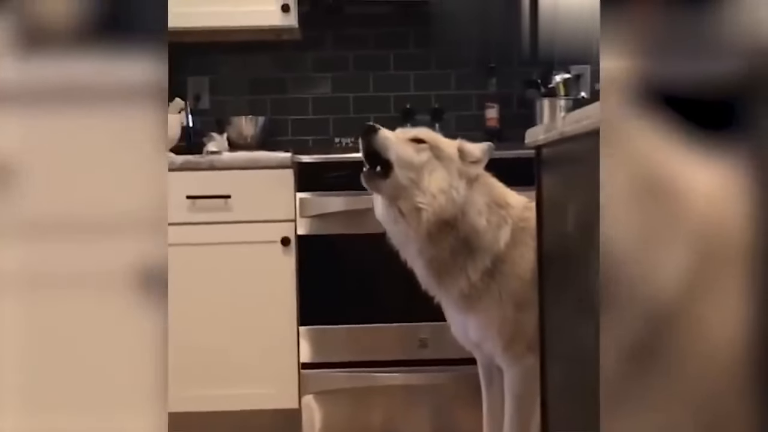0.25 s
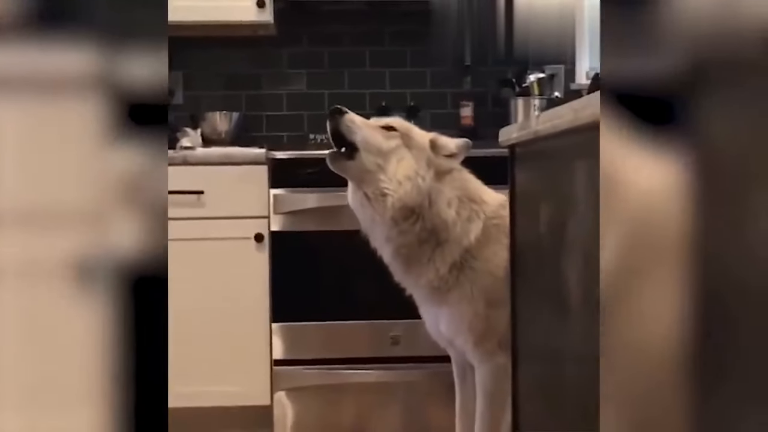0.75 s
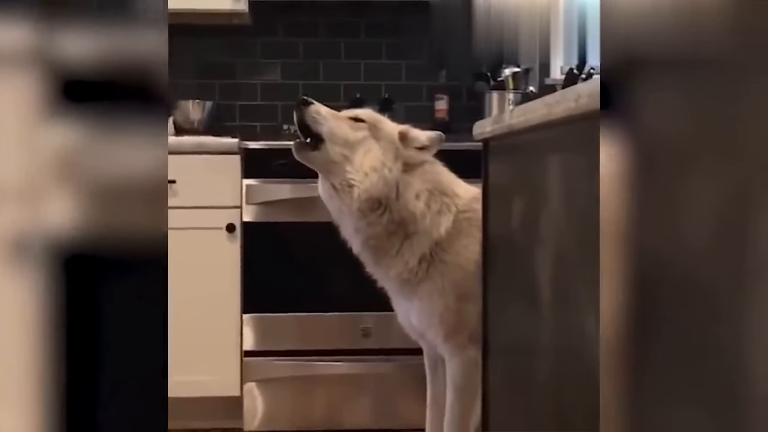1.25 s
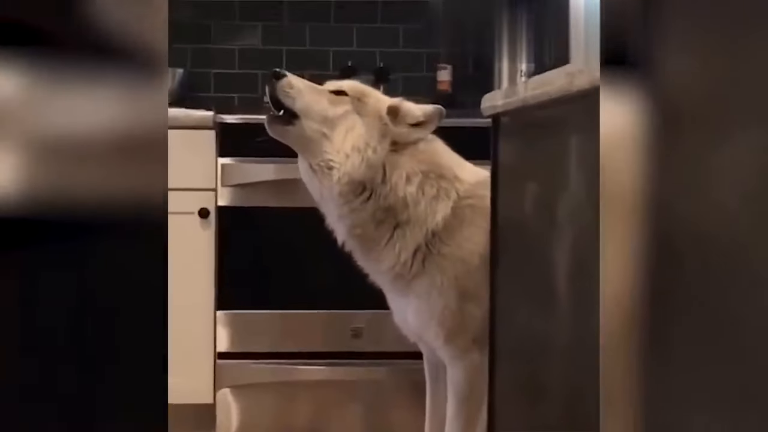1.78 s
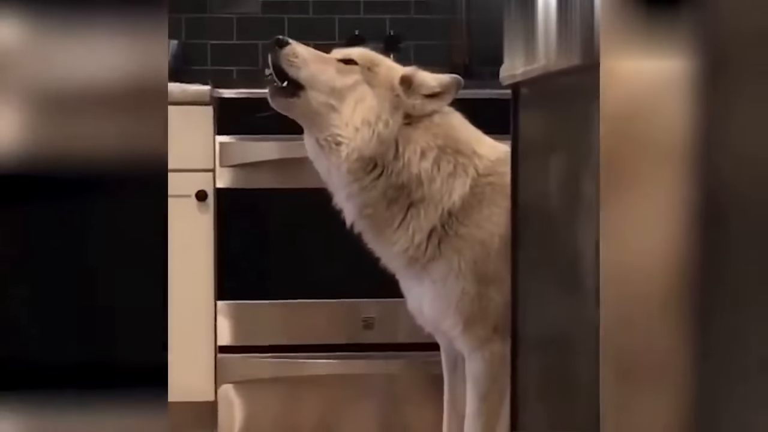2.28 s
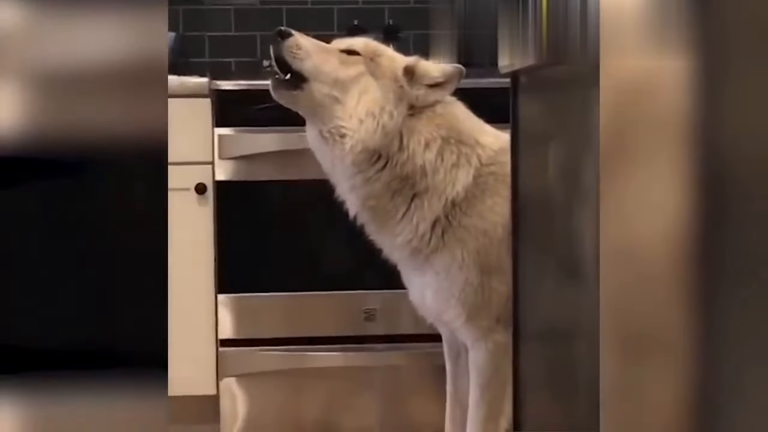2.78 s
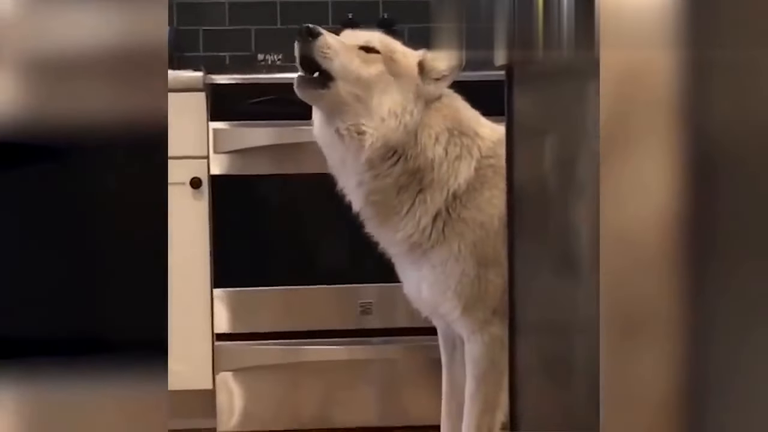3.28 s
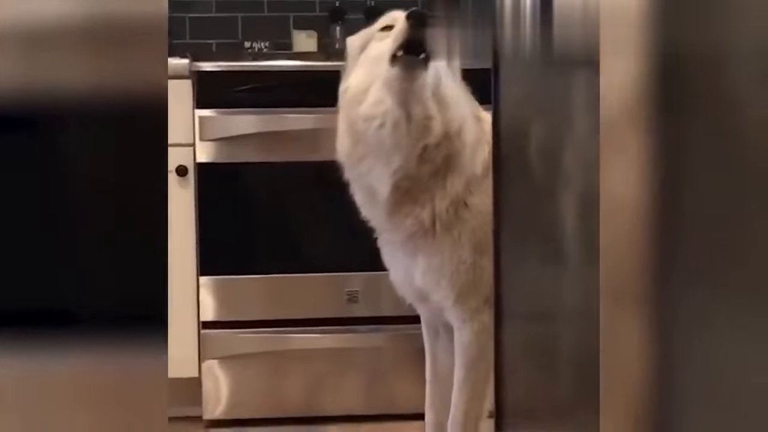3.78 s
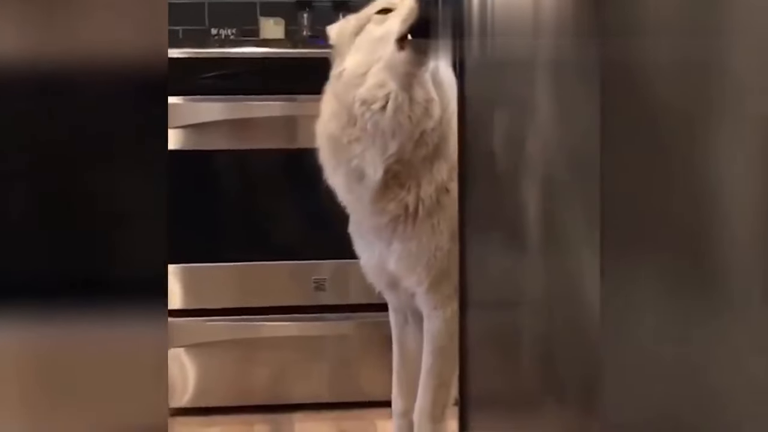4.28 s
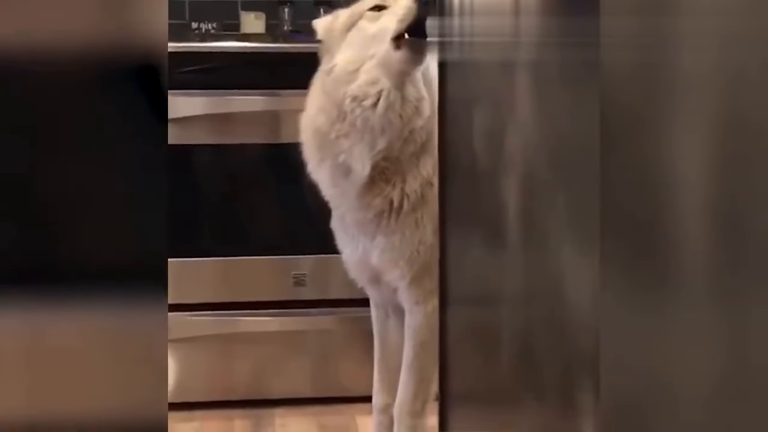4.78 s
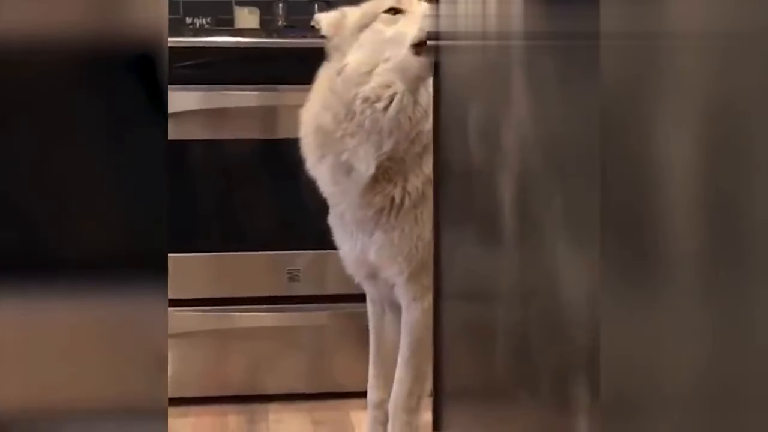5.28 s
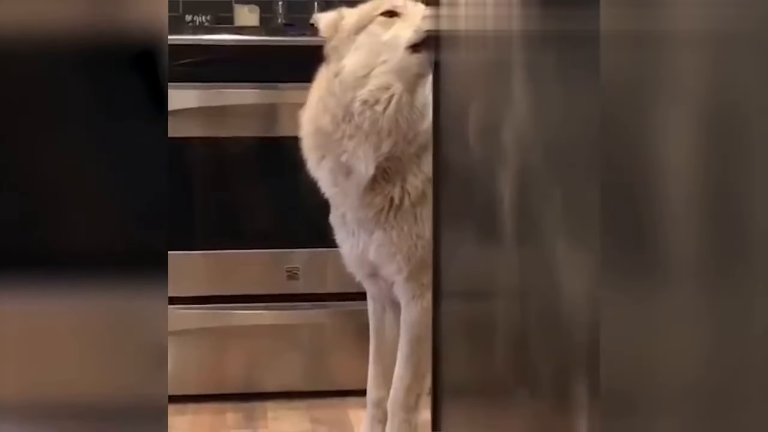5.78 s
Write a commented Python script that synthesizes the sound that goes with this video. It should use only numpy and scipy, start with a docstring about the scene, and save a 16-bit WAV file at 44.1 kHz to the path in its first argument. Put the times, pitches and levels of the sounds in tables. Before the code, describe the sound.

A large dog gives one unbroken howl of about six seconds in a kitchen. From the very start it holds a thin, airy high note that slowly sags, wavering in loudness, with a soft hiss of air and a slight rasp at about 1.3 seconds. Near 1.9 seconds the voice cracks and drops suddenly into a fuller, lower note. This holds fairly steady, droops a little around 3.8 seconds, then recovers and is at its strongest and brightest from about 4.1 to 4.5 seconds. After 5.4 seconds the pitch sinks, the voice roughens slightly, and it fades away by about 6 seconds. The dog is in the same room as the microphone, its muzzle pointing up and away. Cupboards and tiles add a short ring, and an appliance hums very faintly underneath throughout.

```python
"""A large dog howls once in a kitchen, its muzzle pointed up and away from a mono microphone.
Its vocal folds hold a thin, airy high note that sags, breaks suddenly into a fuller low register,
droops as the head turns, recovers and sinks away. Air rushes through the glottis and hisses in
the open mouth. Nearby cupboards and hard tiles answer briefly, and the partials dip in the
room's standing waves. An appliance hums faintly underneath."""
import sys
import numpy as np
from scipy import signal
from scipy.fft import rfft, irfft, next_fast_len
from scipy.io import wavfile
from scipy.ndimage import uniform_filter1d, map_coordinates

SR = 44100
rng = np.random.default_rng(int(sys.argv[2]) if len(sys.argv) > 2 else 0)


def wrap_up_sound(samples):
    """Save the sound to the file named by the first command line argument, as 16-bit audio."""
    columns = np.atleast_2d(samples).T
    # keep every value between -1 and 1, then stretch to whole-number steps
    tamed = np.clip(columns, -1, 1)
    steps = np.round(tamed * 32767).astype(np.int16)
    wavfile.write(sys.argv[1], SR, steps)


N = 266667
TIME_S = np.arange(N) / SR
STEP = 32  # samples per value of a slow control
BREAK_S = 1.855  # the voice drops from the high register to the low


def amp(db):
    """Decibels to gain."""
    return np.exp(np.asarray(db) * np.log(10) / 20)


def unit(x):
    """x at rms 1."""
    return x / np.sqrt(np.mean(x ** 2) + 1e-20)


def along(points, hz):
    """(freq_hz, value) points read on a log axis."""
    freqs, values = np.transpose(points)
    return np.interp(np.log(hz + 1), np.log(freqs + 1), values)


def curves(rows):
    """One value per sample for each column after the time."""
    times, *columns = np.transpose(rows)
    return [np.interp(TIME_S, times, column) for column in columns]


def held(slow):
    """A slow control as one value per sample."""
    return uniform_filter1d(np.repeat(slow, STEP), size=STEP)[:N]


def wobble(rate):
    """A smooth random curve, rate knots a second."""
    knots = rng.standard_normal(int(N * rate / SR) + 4)
    return held(map_coordinates(knots, [np.arange(0, N, STEP) * rate / SR]))


def swell(centre_s, half_s):
    """A bell-shaped bump in time, 1 at its centre."""
    return np.exp(-((TIME_S - centre_s) / half_s) ** 2)


def filtered(x, response):
    """x times a response of frequency."""
    size = next_fast_len(N + SR // 2)
    return irfft(rfft(x, size) * response(np.fft.rfftfreq(size, 1 / SR)), size)[:N]


def noise(spectrum):
    """Noise of rms 1, coloured by (freq_hz, density_db) points."""
    return unit(filtered(rng.standard_normal(N), lambda hz: amp(along(spectrum, hz))))


def resonances(modes, hz):
    """Gain of a set of steep-sided resonances."""
    return sum(amp(db) / (1 + (2 * (hz - centre) / width) ** 2) for centre, width, db in modes)


# The high note sags until it breaks: time_s, pitch_hz
HIGH_PITCH = [(0, 524), (.1, 518.5), (.6, 505), (.82, 489), (1.33, 462.5), (1.5, 462), (1.72, 432),
              (1.79, 424), (1.85, 395)]
# The low note holds, droops as the head turns, recovers and falls: time_s, pitch_hz
LOW_PITCH = [(1.86, 356), (1.89, 349.7), (2.05, 333), (2.3, 333.3), (2.7, 338.8), (3.1, 342.2), (3.45, 337),
             (3.77, 318), (3.88, 321.3), (4.03, 322), (4.17, 334.4), (4.32, 338.4), (4.6, 340.8),
             (4.9, 340.9), (5.37, 334.3), (5.72, 310.7), (5.84, 299.7)]
# Rasps in the voice: centre_s, half_length_s, added_roughness, added_rush_db
VOICE_RASPS = [(1.323, .05, .7, 2), (1.861, .04, .7, 2.5), (1.962, 0.067, .15, 6.5)]


def vocal_folds(switch_s=.012, sink_hz_per_s=70, slack_hz=328.6):
    """The folds change register (low goes from 0 to 1), and slacken and roughen below slack_hz."""
    low = np.clip(.5 + (TIME_S - BREAK_S) / switch_s, 0, 1)
    (high_hz,), (low_hz,) = curves(HIGH_PITCH), curves(LOW_PITCH)
    final_sink_hz = sink_hz_per_s * np.maximum(TIME_S - LOW_PITCH[-1][0], 0)
    pitch = (1 - low) * high_hz + low * low_hz - final_sink_hz
    slack = np.exp(-np.maximum(pitch - slack_hz, 0) / 6)
    rough = (1 - low) * .2 + low * .11 + .26 * np.clip((slack_hz - pitch) / 40, 0, 1)
    # rushing air grows as the high note is strained and weakens when the folds slacken
    rush_db = (1 - low) * (-33 + 3.5 * TIME_S) + low * (-35 - 5 * slack)
    for centre_s, half_s, added_roughness, added_rush_db in VOICE_RASPS:
        rasp = swell(centre_s, half_s)
        rough += added_roughness * rasp
        rush_db += added_rush_db * rasp
    return pitch, low, slack, rough, rush_db


def fold_phase(pitch, rough, jitter=.008, waver=.009):
    """Phase of the folds: a slow waver and a quick jitter, both growing with roughness."""
    drift = rough * (waver * wobble(50) + jitter * wobble(160))
    return 2 * np.pi * np.cumsum(pitch * (1 + drift)) / SR


# Partials passing through the room's nulls: centre_s, partial_number, half_length_s, depth_db
ROOM_NULLS = [(0.277, 1, 0.059, -19.5), (0.418, 2, 0.073, -17.5), (0.561, 1, 0.11, -22.5),
              (0.857, 2, 0.019, -17), (1.072, 1, 0.02, -4), (1.106, 2, 0.047, -12.5), (1.27, 2, 0.049, -24),
              (1.327, 1, 0.085, -10), (1.54, 2, 0.03, -14.5), (1.567, 1, 0.076, -18), (1.654, 1, 0.042, -7),
              (2.056, 2, 0.022, -11), (2.474, 2, 0.163, -20), (2.712, 3, 0.18, -8), (3.0, 3, 0.087, -10.5),
              (3.209, 3, 0.031, -18), (3.517, 2, 0.027, -17), (3.554, 1, 0.117, -4),
              (3.737, 3, 0.023, -14.5), (4.032, 2, 0.23, -20.5), (4.069, 3, 0.041, -22),
              (4.17, 1, 0.121, -19.5), (4.393, 3, 0.101, -21.5), (4.538, 4, 0.22, -15.5),
              (4.982, 4, 0.22, -14), (5.421, 4, 0.25, -16), (5.429, 1, 0.078, -29),
              (5.596, 1, 0.025, -14.5), (5.828, 1, 0.061, -18.5)]


def standing_waves(k, pitch, ripple_db=5, half_ripple_hz_per_s=320):
    """Gain of partial k at the microphone: sharp nulls, and a ripple that deepens with faster glides."""
    dips = np.ones_like(TIME_S[::STEP])
    for centre_s, partial, half_s, depth_db in ROOM_NULLS:
        if round(partial) == k:
            away = ((TIME_S[::STEP] - centre_s) / half_s) ** 2
            dips *= np.sqrt((away + amp(depth_db) ** 2) / (away + 1))
    glide = k * uniform_filter1d(np.abs(np.gradient(pitch)) * SR, size=SR // 5)
    return held(dips) * amp(ripple_db * glide / (glide + half_ripple_hz_per_s) * wobble(22))


# Each note before the room's nulls: time_s, fundamental_db, octave_db, third_and_fourth_db
HIGH_LEVELS = [(0.0, -20, -34, -64.5), (0.05, -20, -21.5, -58), (0.34, -31.0, -24.5, -50),
               (0.6, -27.0, -23, -57), (0.76, -25, -28, -59.0), (1.05, -24, -33.5, -57.5),
               (1.2, -20.0, -27, -49.5), (1.54, -18.5, -28, -58.5), (1.66, -19.5, -39.5, -44),
               (1.82, -21, -34, -43)]
LOW_LEVELS = [(1.861, -17.5, -26.5, -37.0), (1.95, -17.5, -28.5, -36), (2.06, -22.0, -31.5, -31.5),
              (2.74, -18.5, -26.5, -28.5), (3.08, -17.5, -34.5, -38.5), (3.46, -16.5, -30.5, -27.5),
              (3.7, -18.0, -28, -35.5), (3.85, -21.0, -34.5, -38), (4.109, -11.0, -25.5, -21),
              (4.38, -14.5, -22.0, -26), (4.59, -17.5, -24, -32.5), (5.29, -18.5, -21.5, -27.0),
              (5.56, -20.0, -45.0, -34.5), (5.69, -17.0, -43.5, -31), (5.84, -19.5, -32.5, -47),
              (6.05, -35.5, -60, -71)]
# Mouth resonance that the high note's fourth partial slides off: centre_hz, width_hz, gain_db
FOURTH_RESONANCE = [(2115, 260, 0.5)]


def partial_strengths(pitch, low):
    """The four lowest partials: at the break the first chokes; the third cracks as the folds catch."""
    first_db, second_db, third_db = (1 - low) * curves(HIGH_LEVELS) + low * curves(LOW_LEVELS)
    choke_db = -21 * swell(BREAK_S - .012, half_s=.015)
    crack_db = 15.5 * swell(BREAK_S + .0075, half_s=.009)
    fourth_gain = (1 - low) * resonances(FOURTH_RESONANCE, 4 * pitch) + low * amp(-4)
    levels = [amp(first_db + choke_db), amp(second_db),
              amp(third_db + crack_db), amp(third_db) * fourth_gain]
    return [level * standing_waves(k, pitch) for k, level in enumerate(levels, 1)]


def howl_tone(phase, strengths, rough, shimmer=.2, tremor=.32):
    """The folds sound the low partials, each trembling more as the voice roughens."""
    tone = np.zeros(N)
    for k, strength in enumerate(strengths, 1):
        unsteady = 1 + rough * (tremor * wobble(35) + shimmer * wobble(110))
        tone += np.sqrt(2) * strength * unsteady * np.sin(k * phase + rng.uniform(0, 2 * np.pi))
    return tone


# Colour of the air in the glottis: freq_hz, density_db
RUSH_SPECTRUM = [(150, -37), (280, -17), (400, 1), (560, -5), (690, 4.5), (850, -11), (1100, -1.5),
                 (1250, -10), (1400, -7.5), (1650, -29.5), (2500, -38), (4000, -79)]


def rushing_air(effort, rush_db):
    """Air rushes through the glottis, following the strength of the voice."""
    return effort * amp(rush_db) * cupboards(noise(RUSH_SPECTRUM))


# Antiresonances of the airway: centre_hz, width_hz, depth_db
CAVITY_NOTCHES = [(1840, 74, -6), (2980, 130, -11), (4120, 99, -24), (5250, 140, -21.5), (7040, 51, -11.5)]


def side_cavities(hz):
    """Gain left after the side cavities swallow their narrow bands."""
    return amp(sum(db * np.exp(-((hz - centre) / width) ** 2) for centre, width, db in CAVITY_NOTCHES))


def overtones(pitch, phase, modes, highest, flicker=.14):
    """Partials above the fourth, rms near 1, each flickering and swelling as it crosses resonances."""
    grid_hz = np.arange(SR // 2)
    shape = resonances(modes, grid_hz) * side_cavities(grid_hz)
    t, knots_s = TIME_S[::STEP], np.arange(0, N / SR, .03)
    wave, power = np.zeros(N), np.zeros(len(t))
    for k in range(5, highest + 1):
        gain = np.interp(k * pitch[::STEP], grid_hz, shape)
        unsteady = 1 + flicker * np.interp(t, knots_s, rng.standard_normal(len(knots_s)))
        wave += held(gain * unsteady) * np.sin(k * phase + rng.uniform(0, 2 * np.pi))
        power += gain ** 2 / 2
    return wave / held(np.sqrt(power))


# Resonances of the throat and, above them, the muzzle: centre_hz, width_hz, gain_db
THROAT_MODES = [(1569, 110, 3.5), (1990, 150, -1), (2436, 140, -8), (2650, 150, -12.5), (3060, 76, -21)]
MUZZLE_MODES = [(3724, 150, 2), (3890, 63, -11), (4516, 120, -8), (4755, 360, -6.5), (5665, 190, -11.5),
                (5760, 130, -22), (6670, 49, -15), (6930, 95, -21), (7840, 270, -34), (9000, 200, -21),
                (10800, 450, -34)]
# Their overtones through the high note and the low note: time_s, level_db
THROAT_HIGH = [(0.02, -56), (0.2, -67), (0.4, -60), (0.66, -60), (0.9, -71), (1.35, -67.0), (1.68, -67),
               (1.77, -48), (1.84, -53)]
THROAT_LOW = [(1.879, -55), (2, -65.5), (2.15, -54.5), (2.75, -69.5), (3.05, -63.5), (3.48, -65),
              (3.65, -62), (3.8, -57.5), (4.12, -50.5), (4.801, -53.5), (5.3, -59), (5.55, -61.5),
              (5.8, -65.5), (6.031, -81)]
MUZZLE_HIGH = [(0.02, -52), (0.25, -64), (0.7, -63.5), (1.15, -64.5), (1.32, -53.5), (1.55, -65),
               (1.84, -65.5)]
MUZZLE_LOW = [(1.88, -60.5), (2.1, -66), (2.45, -62.5), (2.949, -54.5), (3.15, -62), (3.38, -54.5),
              (3.6, -72.5), (4, -66.0), (4.25, -46.5), (4.5, -52), (4.95, -56), (5.4, -68), (5.65, -71.5),
              (6.03, -92.0)]


def throat_and_muzzle(pitch, phase):
    """Overtones ringing in throat and muzzle, and the average of their two level curves."""
    throat_db, = curves(np.vstack([THROAT_HIGH, THROAT_LOW]))
    muzzle_db, = curves(np.vstack([MUZZLE_HIGH, MUZZLE_LOW]))
    throat = amp(throat_db + .1) * overtones(pitch, phase, THROAT_MODES, highest=10)
    muzzle = amp(muzzle_db + .4) * overtones(pitch, phase, MUZZLE_MODES, highest=33)
    return throat + muzzle, (throat_db + muzzle_db) / 2


# Resonances of the open mouth: centre_hz, width_hz, gain_db
MOUTH_MODES = [(2080, 100, 3), (2560, 230, 5.5), (3880, 410, 0), (4690, 210, 5), (5870, 230, -1),
               (6430, 860, 0), (8740, 770, -10.5), (9660, 500, -6), (10770, 600, -10.5),
               (12000, 600, -20.5)]


def mouth_hiss(phase, low, treble_db, flutter=.3, edge_hz=7500, waver_db=.93):
    """Air escapes in a puff each time the folds open; in the high register they never quite close."""
    puffs = (1 + flutter * np.sin(phase)) * rng.standard_normal(N)
    air = unit(filtered(puffs, lambda hz: resonances(MOUTH_MODES, hz) * side_cavities(hz)))
    top = filtered(air, lambda hz: hz > edge_hz)
    air = air - top + top * amp(2.5 - 2 * np.minimum(TIME_S, BREAK_S))  # dulls up to the break
    high_db = -56.5 - 2.1 * TIME_S  # fades as the air runs out
    low_db = -73.5 + .6 * (treble_db - treble_db.mean())
    level_db = uniform_filter1d((1 - low) * high_db + low * low_db, size=SR // 10)
    return amp(level_db + waver_db * wobble(8)) * air


# Room tone at the microphone: freq_hz, density_db
ROOM_TONE = [(20, -20), (45, -12), (72, -0.5), (100, -10), (130, -8.5), (180, -10), (300, -6.5),
             (700, -16.5), (1500, -27), (4000, -33.5), (12000, -44.5)]


def appliance_and_room_tone(hum_hz=74.6):
    """An appliance hums, wavering slightly, in the quiet air of the kitchen."""
    hum = amp(-65.5 + 2 * wobble(5)) * np.sin(2 * np.pi * np.cumsum(hum_hz + wobble(4.6)) / SR)
    return hum + amp(-61) * noise(ROOM_TONE)


# Cupboard doors, worktop and oven front, within a few metres: delay_s, level_db
EARLY_ECHOES = [(.0023, -17.5), (.0047, -16.5), (.0083, -17), (0.013, -17.5), (0.0193, -7)]


def cupboards(x):
    """Early echoes comb the sound, so gliding partials swell and fade in turn."""
    def comb(hz):
        return 1 + sum(amp(db) * np.exp(-2j * np.pi * hz * delay_s) for delay_s, db in EARLY_ECHOES)
    return filtered(x, comb) / np.sqrt(1 + sum(amp(db) ** 2 for _, db in EARLY_ECHOES))


# Decay of the tiled kitchen: freq_hz, t60_s
KITCHEN_DECAY = [(200, 0.18), (1000, 1), (4000, 0.14), (10000, 0.077)]


def kitchen_reverb(x):
    """The diffuse answer of the room, ringing longest in the midrange."""
    hz, t, spectrum = signal.stft(rng.standard_normal(SR // 2), SR, nperseg=256)
    decay = amp(-60 * t / along(KITCHEN_DECAY, hz)[:, None])
    _, tail = signal.istft(spectrum * decay, SR, nperseg=256)
    return signal.fftconvolve(x, tail / np.linalg.norm(tail))[:N]


def growl(phase, effort, slack):
    """In the low note, slack folds alternate strong and weak cycles, adding a tone an octave down."""
    return effort * amp(-44) * slack * (1 + .5 * wobble(35)) * np.sin(phase / 2)


def scene():
    """The muzzle points up and off microphone, so more of the treble arrives by way of the walls."""
    pitch, low, slack, rough, rush_db = vocal_folds()
    phase = fold_phase(pitch, rough)
    strengths = partial_strengths(pitch, low)
    effort = np.sqrt(uniform_filter1d(sum(strength ** 2 for strength in strengths), size=12000))
    body = howl_tone(phase, strengths, rough) + rushing_air(effort, rush_db) + growl(phase, effort, slack)
    treble, treble_db = throat_and_muzzle(pitch, phase)
    top = cupboards(treble + mouth_hiss(phase, low, treble_db))
    reverb = kitchen_reverb(amp(-19) * body + amp(-8.5) * top)
    return (body + top + reverb + appliance_and_room_tone())[None]


def record(dry):
    """A phone's microphone keeps nothing above its band limit; the sound eases in and out."""
    band_limit_hz, fade_s = 12460, .004
    ease = np.clip(np.minimum(TIME_S, TIME_S[-1] - TIME_S) / fade_s, 0, 1)
    faded = dry[0] * np.sin(np.pi / 2 * ease) ** 2
    return filtered(faded, lambda hz: hz < band_limit_hz)[None]


dry = scene()
out = record(dry)
wrap_up_sound(out)
```